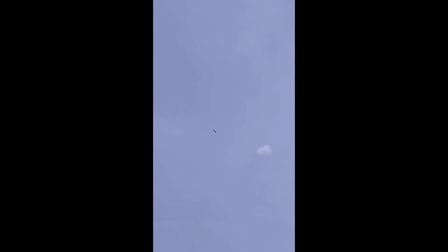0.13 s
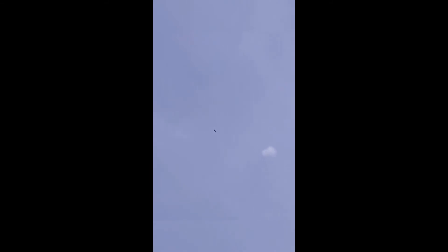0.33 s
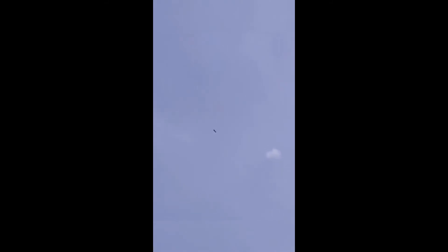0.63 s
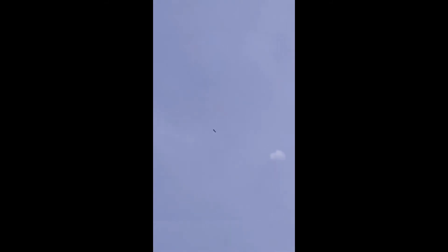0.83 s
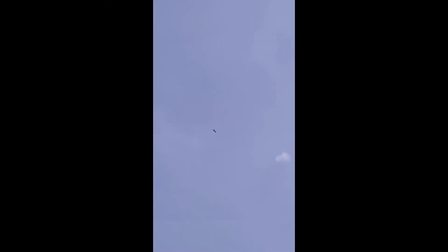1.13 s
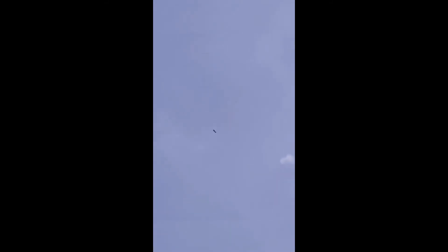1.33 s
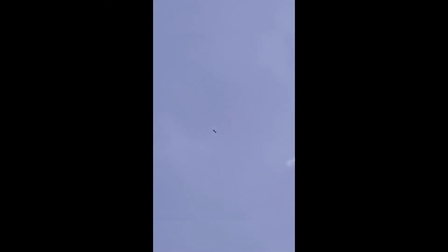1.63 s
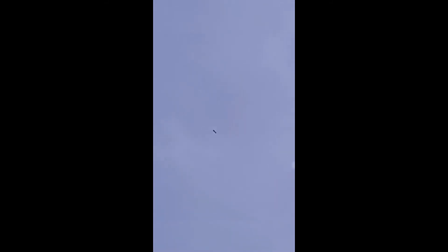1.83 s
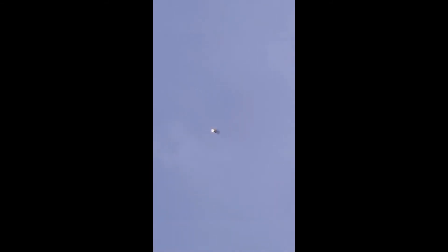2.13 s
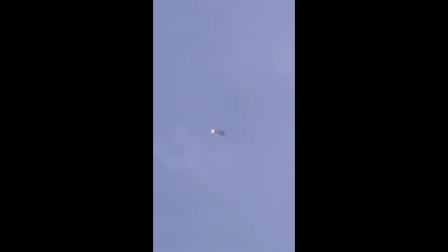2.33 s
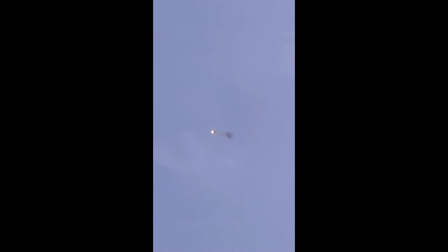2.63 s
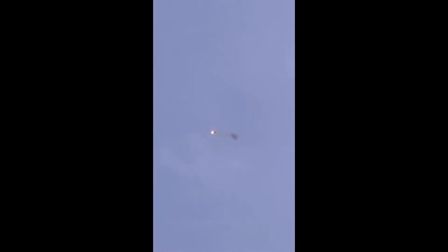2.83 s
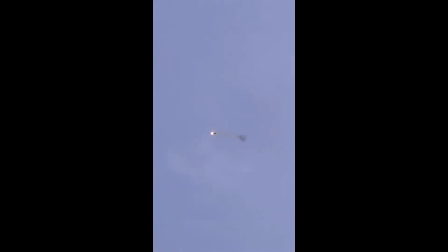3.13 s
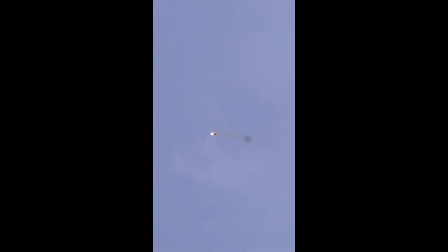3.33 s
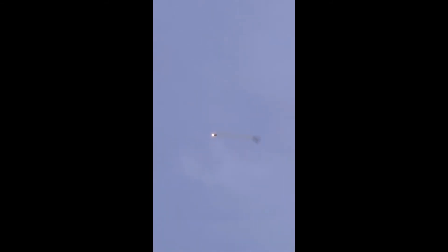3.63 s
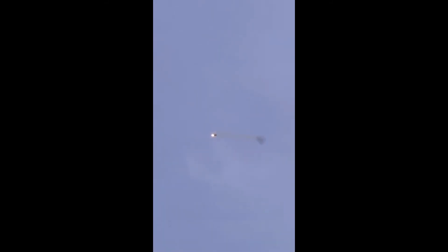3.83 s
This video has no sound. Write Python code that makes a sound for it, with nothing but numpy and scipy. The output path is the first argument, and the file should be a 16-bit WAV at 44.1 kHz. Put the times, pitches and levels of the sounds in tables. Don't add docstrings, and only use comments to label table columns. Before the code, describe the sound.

A returning rocket's sonic booms over open ground. Until 1.86 s only quiet low wind, distant traffic, slight hiss and a very faint far hum. Then three violent bangs at about 1.86, 2.12 and 2.25 s, the first loudest, with low thumping echoes to 2.5 s. Deep rumble rolls on, easing slowly, while irregular dry cracks snap until 4 s, their peaks squashed by a phone microphone.

```python
import sys
import numpy as np
from scipy import signal
from scipy.fft import irfft
from scipy.io import wavfile
from scipy.ndimage import uniform_filter1d, minimum_filter1d

SR = 44100
rng = np.random.default_rng(int(sys.argv[2]) if len(sys.argv) > 2 else 0)


def bounce(signal):
    frames = np.transpose(np.atleast_2d(signal))
    limited = np.clip(frames, -1, 1)
    pcm = np.round(limited * 32767).astype(np.int16)
    wavfile.write(sys.argv[1], SR, pcm)


def to_linear_factor(level_db):
    exponent = np.asarray(level_db, float) / 20
    return 10 ** exponent


N = 176400
LEFT_RIGHT = np.array([[1], [-1]])

# time_s, level_db, brightness_db_per_octave
AIR_COURSE = [
    (0, -34.5, -1.5),
    (1.2, -35, -1),
    (1.85, -34, -0.16),
    (2.6, -38.5, -1.5),
    (4, -42.5, 2.5),
]
# pitch_hz, level_db_per_hz
AIR_SPECTRUM = [(12, -76.5), (20, -19.5), (65, -1.5), (189, -7), (381, -15.5), (426, -18.5), (585, -14),
                (1160, -16), (2200, -26.5), (4300, -43.5), (5850, -51), (9900, -120)]
AIR_PAN_DB, HISS_DB, HISS_HZ = 2.5, -58.5, 5940
HISS_DUCK_DB, HISS_BACK_S = -6, 2
DRONE_HZ, DRONE_WIDTH_HZ, DRONE_DB, DRONE_FROM_S = 610, 30, -55, 1.1

# start_s, level_db, ring_db
BOOMS = [
    (1.8618, -2, -6),
    (2.1247, -7, -11),
    (2.2531, -4.5, -8),
]
FIRST_S = BOOMS[0][0]
TURN_RATIO, START_S, RISE_S, SWEEP_T60_S = 2.7, .00015, .0003, .04
SWEEP_AFTER_S, CREST_S = .001, .0022
RING_HZ, RING_T60_S = 5740, 0.0045
BOOM_LAG_S, LAG_FADE_S = 0.00028, .003
BOOM_GROUND_S, BOOM_GROUND_DB, BOOM_GROUND_HZ = .0096, -4.5, 1800
# pitch_hz, level_db_per_hz
SCATTER_SPECTRUM = [(120, -27.5), (200, -9), (349, -20), (1460, -42.5), (2110, -23.5), (5410, -25),
                    (6540, -31.5), (9000, -82), (11700, -110), (19800, -120)]
SCATTER_DB, SCATTER_RISE_S, SCATTER_T60_S = -29, 0.11, .8
TIP_DB, TIP_HZ, TIP_S, TIP_AFTER_S = -31, 11800, .0001, 0.00068

# centre_s, level_db, length_s, left_minus_right_db
GRIT = [(1.8617, -11, 0.0013, -3), (1.867, -26, 0.0027, -5), (2.0185, -24.5, 0.00094, 4),
        (2.103, -33.5, 0.0088, -4), (2.115, -25, 0.0019, -2.5), (2.122, -23.5, 0.01, 1),
        (2.132, -37, 0.0014, -16), (2.212, -29.5, 0.0036, 1.5), (2.247, -32, 0.018, 3),
        (2.2543, -17.5, 0.002, 3.5), (2.264, -32.5, 0.0013, -1.5), (2.226, -29, 0.0071, -3),
        (2.504, -33, 0.0014, 4), (3.456, -44, 0.0014, 0), (3.467, -45, 0.0018, -0.5),
        (3.71, -49, .008, -11), (3.932, -38, 0.0049, 0)]
GRIT_LOW_HZ, GRIT_TOP_HZ, GRIT_ROUGH_DB = 590, 2640, 3

# time_s, level_db, brightness_db_per_octave
RUMBLE_COURSE = [(1.88, -20, 0), (1.93, -18.5, -0.5), (2.02, -13, 3), (2.08, -18, 1.5), (2.13, -10, 1.5),
                 (2.18, -21.5, -2), (2.25, -12, 3), (2.3, -15, 1.5), (2.49, -12.5, 0.5), (2.6, -13, 1),
                 (2.93, -15, 0), (2.98, -14.5, 0.5), (3.2, -15.5, -0.5), (3.45, -17, -1), (3.52, -17, -2),
                 (3.76, -18, -0.5), (3.9, -18, -2), (4, -19, -1)]
# pitch_hz, level_db_per_hz
RUMBLE_SPECTRUM = [(12, -31.5), (20, 2), (43, 0.5), (101, 4.5), (185, -10.5), (226, -19), (458, -22),
                   (538, -24.5), (2500, -50.5), (3250, -67.5), (5500, -120)]
EVEN_S, EVEN_SHARE = .06, .25
HEAVE_HZ, HEAVE_DB, HEAVE_T60_S, HEAVE_RISE_S = 36, -9, 0.61, 0.025
ROAR_DB, ROAR_LOW_HZ, ROAR_TOP_HZ, ROAR_T60_S, ROAR_ROUGH_DB = -30, 185, 920, 5.65, 1.5

# time_s, level_db
FIZZ_COURSE = [
    (1.87, -56),
    (2.45, -53.5),
    (2.65, -54.5),
    (2.9, -59),
    (3.15, -58),
    (3.3, -56),
    (3.6, -59.5),
    (4, -57),
]
FIZZ_LOW_HZ, FIZZ_TOP_HZ, FIZZ_ROUGH_DB = 2300, 3480, 1
FIZZ_DIP_HZ, FIZZ_DIP_SHARE = 4500, .85

# start_s, peak_db, fall_ms, rise_ms
CRACKS = [(1.943, -7, 0.25, 0.042), (2.233, -1.5, 0.35, 0.24), (2.394, -7, 0.28, 0.042),
          (2.46, -15, 0.22, 0.14), (2.492, -33, 0.82, 0.098), (2.576, -23, 0.23, 0.14),
          (2.671, -31, .4, 0.11), (2.723, -35, .4, .15), (2.852, -11, 0.71, 0.16), (2.959, -37, 0.46, 0.09),
          (3.065, -5, 0.35, 0.2), (3.114, -29.5, 0.21, 0.087), (3.249, -11, 0.32, 0.15),
          (3.296, -16.5, 0.52, 0.12), (3.348, -30, 0.29, 0.096), (3.422, -14, 0.26, 0.1),
          (3.431, -10.5, 0.25, 0.22), (3.475, -23, 0.55, 0.15), (3.535, -9.5, 0.26, 0.082),
          (3.633, -12.5, 0.33, 0.09), (3.674, -22, 0.27, 0.086), (3.705, -10.5, 0.21, 0.13),
          (3.804, -20.5, 0.64, 0.16), (3.898, -14, 0.67, 0.073), (3.94, -24, 0.43, 0.089),
          (2.0177, -16, 0.25, 0.34), (3.591, -43, 0.35, .15), (3.757, -30, .4, .15),
          (1.9726, -12.5, .5, 0.12), (2.4246, -13.5, 0.28, 0.07), (3.094, -23.5, 0.19, 0.1),
          (3.9293, -25.5, 1, 0.083), (2.621, -31.5, .5, .25), (3.976, -21, 0.33, 0.19)]
CRACK_DB, CRACK_DELAY_S = 9, 0.001164
SPUTTER_DB, SPUTTER_SPREAD_DB, SPUTTER_MOST_DB, SPUTTER_MS = -36.5, 7.5, -27, 1
PORT_HZ, PORT_WIDTH_HZ, PORT_DB = 6500, 2600, -5.5
DIP_HZ, DIP_WIDTH_HZ, DIP_SHARE = 4500, 1600, .85
GROUND_S, GROUND_DB = .0105, -20
WALL_S, WALL_DB, ECHO_TOP_HZ = .0306, -13, 4500
FIELD_DB, FIELD_T60_S, FIELD_LOW_HZ, FIELD_RISE_S = -38, .35, 1500, .022

# start_s, level_db, pitch_hz, t60_s
THUMPS = [
    (1.964, -13, 118, .06),
    (1.999, -8.5, 170.6, .07),
    (2.021, -11.5, 131, 0.071),
    (2.096, -10, 130, 0.13),
    (2.354, -14, 120, 0.19),
    (2.515, -7, 101, 0.11),
]

PHONE_TOP_HZ, PHONE_LEAK_DB, LIMIT, END_FADE_S = 8100, -24, 1.34, .004
HOLE_SHARE, HOLE_DB, HOLE_S, HOLE_FROM_DB, CALM_HOLE_SHARE = .15, -35, .08, -46, .06
DUCK_DB, SPARSE_SHARE, SPARSE_DB, KEPT_DB = -10, 1., -16, 1.5


def lines(table, t, axis=1):
    return np.interp(t, np.array(table)[:, 0], np.array(table)[:, axis])


def band(x, hz, kind, order=2):
    return signal.sosfilt(signal.butter(order, np.clip(hz, 5, .45 * SR), kind, fs=SR, output="sos"), x)


def near(x, hz, width_hz, order=1):
    return band(x, [hz - width_hz / 2, hz + width_hz / 2], "band", order)


def late(x, s):
    return np.interp(np.arange(N) - s * SR, np.arange(N), x, left=0)


def walk(rate):
    k = int(SR / rate)
    held = np.repeat(rng.standard_normal(N // k + 1), k)
    return 1.42 * uniform_filter1d(uniform_filter1d(held, k), k)[:N]


def noise(spectrum, wide_hz, swell_db, flicker_db, rate, tilt_db=0):
    out, swell = 0, walk(rate / 3)
    hz_points, db_points = np.array(spectrum).T
    low, top = hz_points[0], hz_points[-1]
    f = np.arange(N // 2 + 1) * SR / N + 1e-3
    shape = to_linear_factor(np.interp(np.log(f), np.log(hz_points), db_points))
    shape = shape * (f > low / 2) / (1 + (f / top) ** 8)
    for hz in 20 * 2 ** np.arange(0, np.log2(top / 20) + 1, .5):
        window = np.cos(np.pi * np.clip(np.log2(f / hz), -.5, .5)) ** 2
        phases = np.exp(2j * np.pi * rng.random((2, len(f))))
        mid, side = irfft(phases * shape * window, N)
        db = swell_db * swell + flicker_db * walk(rate) + tilt_db * np.log2(hz / 300)
        out = out + to_linear_factor(db) * (mid + min(0.024 + hz / wide_hz, 1) * side * LEFT_RIGHT)
    return out / np.std(out)


def air(t):
    wind = to_linear_factor(lines(AIR_COURSE, t)) * noise(AIR_SPECTRUM, 1500, .4, .8, 9, lines(AIR_COURSE, t, axis=2))
    duck = HISS_DUCK_DB * (t > FIRST_S) * np.exp(-(t - FIRST_S) / HISS_BACK_S)
    hiss = to_linear_factor(HISS_DB + duck) * band(rng.standard_normal((2, N)), HISS_HZ, "high", order=1)
    return wind * to_linear_factor(LEFT_RIGHT * AIR_PAN_DB / 2) + hiss


def drone(t):
    x = near(rng.standard_normal(N), DRONE_HZ, DRONE_WIDTH_HZ, order=2)
    hum = np.sin(2 * np.pi * np.cumsum(DRONE_HZ + 4 * walk(8)) / SR)
    x = x / np.std(x) / 2 + hum
    return to_linear_factor(DRONE_DB) * x / np.std(x) * np.clip((t - DRONE_FROM_S) / 0.05, 0, 1)


def booms(t):
    direct, tail_power = np.zeros((2, N)), np.zeros(N)
    for s, db, ring_db in BOOMS:
        u = np.clip(t - s, 0, 1)
        for ear in range(2):
            lag = ear * BOOM_LAG_S * np.exp(-(u / LAG_FADE_S / 2) ** 2)
            v = np.clip(u - SWEEP_AFTER_S - lag, 0, 1)
            turns = np.log((v + START_S) / CREST_S) / np.log(TURN_RATIO)
            chirp = np.cos(2 * np.pi * turns) * to_linear_factor(db - 60 * v / SWEEP_T60_S)
            ring = np.sin(2 * np.pi * RING_HZ * u + 1.5 * ear) * to_linear_factor(ring_db - 60 * u / RING_T60_S) * u / 0.00059
            direct[ear] += (1 - np.exp(-v / RISE_S)) * chirp + ring
        tail_power += to_linear_factor(2 * (db - 60 * u / SCATTER_T60_S)) * (1 - np.exp(-u / SCATTER_RISE_S))
    echo = np.array([late(x, BOOM_GROUND_S) for x in direct])
    direct = direct + to_linear_factor(BOOM_GROUND_DB) * band(echo, BOOM_GROUND_HZ, "low")
    return direct + to_linear_factor(SCATTER_DB) * np.sqrt(tail_power) * noise(SCATTER_SPECTRUM, 900, 1.5, 2.5, 30)


def front_tip(t):
    u = t - FIRST_S - TIP_AFTER_S
    return to_linear_factor(TIP_DB) * np.sin(2 * np.pi * TIP_HZ * u) * np.exp(-(u / TIP_S) ** 2)


def grit(t):
    env = 0
    for s, db, length, pan_db in GRIT:
        env = env + to_linear_factor(db + LEFT_RIGHT * pan_db / 2) * np.exp(-((t - s) / length) ** 2)
    x = rng.standard_normal((2, N)) * to_linear_factor(GRIT_ROUGH_DB * walk(700))
    x = band(band(x, GRIT_LOW_HZ, "high", order=1), GRIT_TOP_HZ, "low")
    return env * x / np.std(x)


def rumble(t):
    onset = 1 - np.exp(-np.clip(t - FIRST_S, 0, 9) / 0.019)
    x = noise(RUMBLE_SPECTRUM, 1200, 0.24, 1.32, 14, lines(RUMBLE_COURSE, t, axis=2))
    power = uniform_filter1d((x ** 2).mean(0), int(EVEN_S * SR))
    x = x / (power + .05) ** EVEN_SHARE
    since = np.clip(t - np.array(BOOMS)[:, :1], 0, 9)
    heave = np.sin(2 * np.pi * HEAVE_HZ * since) * to_linear_factor(HEAVE_DB - 60 * since / HEAVE_T60_S)
    heave = heave * (1 - np.exp(-since / HEAVE_RISE_S))
    return onset * to_linear_factor(lines(RUMBLE_COURSE, t)) * x + heave.sum(0)


def roar(t):
    u = np.clip(t - FIRST_S, 0, 9)
    x = rng.standard_normal((2, N)) + 2 * rng.standard_normal(N)
    x = band(x, [ROAR_LOW_HZ, ROAR_TOP_HZ], "band", order=1)
    x = band(x, 2 * ROAR_TOP_HZ, "low", order=3)
    level_db = ROAR_DB - 60 * u / ROAR_T60_S + ROAR_ROUGH_DB * walk(40)
    return x / np.std(x) * to_linear_factor(level_db) * (1 - np.exp(-u / 0.2))


def fizz(t):
    x = band(rng.standard_normal((2, N)), FIZZ_LOW_HZ, "high", order=1)
    x = band(x, FIZZ_TOP_HZ, "low", order=1)
    x = x - FIZZ_DIP_SHARE * near(x, FIZZ_DIP_HZ, 1000)
    x = band(x, PHONE_TOP_HZ, "low", order=8)
    level_db = lines(FIZZ_COURSE, t) + 1.4 * walk(15) + FIZZ_ROUGH_DB * walk(230)
    return x / np.std(x) * to_linear_factor(level_db) * (t > FIRST_S)


def sputter():
    shocks = []
    for when, strength, length in rng.random((150, 3)):
        db = min(SPUTTER_DB - SPUTTER_SPREAD_DB * np.log(strength), SPUTTER_MOST_DB)
        shocks.append((FIRST_S + 3.1 * when, db, SPUTTER_MS * (.5 + 2 * length), .15))
    return shocks


def cracks(t):
    x = np.zeros(N + SR)
    ms = np.arange(600) / SR * 1000
    sharp = [(s + CRACK_DELAY_S, db + CRACK_DB, fall, rise) for s, db, fall, rise in CRACKS]
    for s, db, fall, rise in sharp + sputter():
        i = int(s * SR)
        x[i:i + len(ms)] -= to_linear_factor(db) * np.exp(-ms / fall) * (1 - np.exp(-(ms / rise) ** 2))
    x = x[:N]
    x = x + to_linear_factor(PORT_DB) * near(x, PORT_HZ, PORT_WIDTH_HZ)
    x = x - DIP_SHARE * near(x, DIP_HZ, DIP_WIDTH_HZ)
    echo = to_linear_factor(GROUND_DB) * late(x, GROUND_S) + to_linear_factor(WALL_DB) * late(x, WALL_S)
    echo = band(echo, ECHO_TOP_HZ, "low", order=1)
    u = t[:SR // 2]
    field_db = FIELD_DB - 60 * u / FIELD_T60_S + 2.2 * walk(110)[:len(u)]
    field = rng.standard_normal((2, len(u))) * to_linear_factor(field_db) * np.clip(u / FIELD_RISE_S, 0, 1)
    return x + echo + signal.fftconvolve(band(x, FIELD_LOW_HZ, "high")[None], field, axes=1)[:, :N]


def thumps(t):
    s, db, hz, t60 = np.array(THUMPS).T[:, :, None]
    u = np.clip(t - s, 0, 1)
    return (np.sin(2 * np.pi * hz * u) * to_linear_factor(db - 60 * u / t60) * (1 - np.exp(-u / 0.0011))).sum(0)


def scene():
    t = np.arange(N) / SR
    shocks = booms(t) + grit(t) + cracks(t)
    leak = to_linear_factor(PHONE_LEAK_DB) * band(shocks, PHONE_TOP_HZ, "high")
    shocks = band(shocks, PHONE_TOP_HZ, "low", order=8) + leak
    return air(t) + drone(t) + shocks + front_tip(t) + rumble(t) + roar(t) + fizz(t) + thumps(t)


def band_limit(x):
    return signal.sosfilt(signal.butter(12, 13200, fs=SR, output="sos"), x)


def record(dry):
    fade = np.clip(np.arange(N)[::-1] / SR / END_FADE_S, 0, 1)
    f, s, z = signal.stft(LIMIT * np.tanh(dry / LIMIT) * fade, SR, nperseg=2048, noverlap=1536)
    hz = f[:, None]
    treble = hz > 1800
    level = np.sqrt(2 * (np.abs(z[:, f > 1800]) ** 2).mean(0).sum(0))
    steady = uniform_filter1d(minimum_filter1d(level, size=7), size=5)
    even = level < 2.5 * steady
    busy = (steady > to_linear_factor(HOLE_FROM_DB)) & even
    draw = rng.random((120, 200))[(f // 190).astype(int)][:, (s / HOLE_S).astype(int)]
    share = np.where(busy, HOLE_SHARE, CALM_HOLE_SHARE * (hz > 3000))
    gain = np.where(treble & (draw < share) & even, to_linear_factor(HOLE_DB), 1.)
    duck_from_hz = 6700 + 1600 * (draw[0] > .35)
    gain = gain * to_linear_factor(DUCK_DB * busy * (hz > duck_from_hz))
    around = np.sqrt(uniform_filter1d(np.abs(z) ** 2, size=9, axis=1))
    weak = treble & even & (np.abs(z) < SPARSE_SHARE * around)
    gain = gain * np.where(weak, to_linear_factor(SPARSE_DB), to_linear_factor(KEPT_DB * (treble & even)))
    mix = signal.istft(z * gain, SR, nperseg=2048, noverlap=1536)[1][:, :N]
    return band_limit(mix)


dry = scene()
out = record(dry)
bounce(out)
```